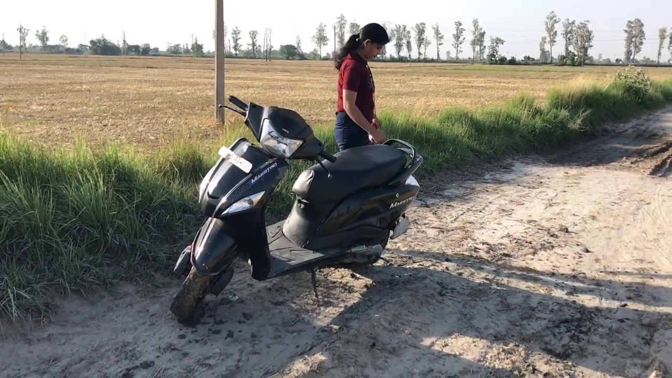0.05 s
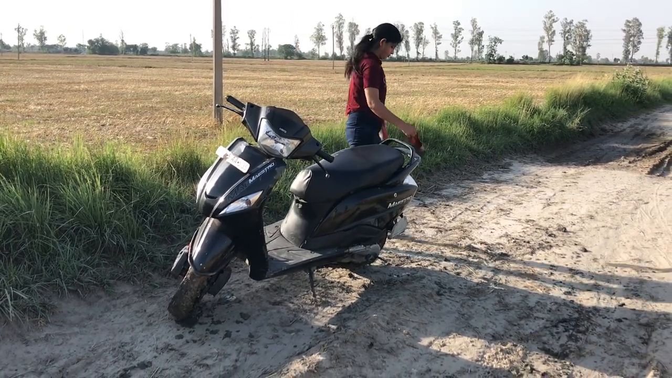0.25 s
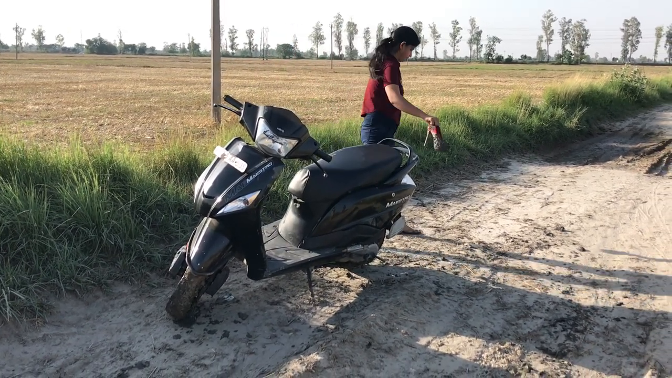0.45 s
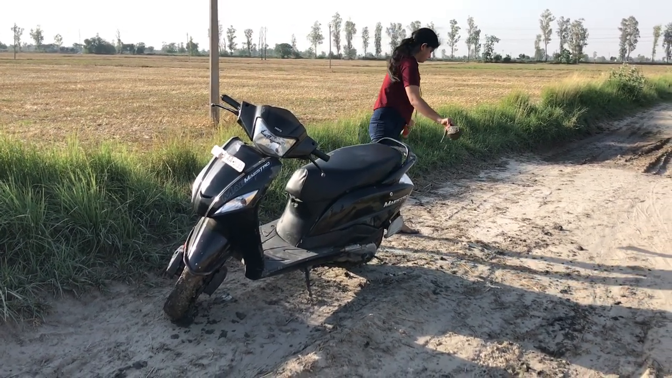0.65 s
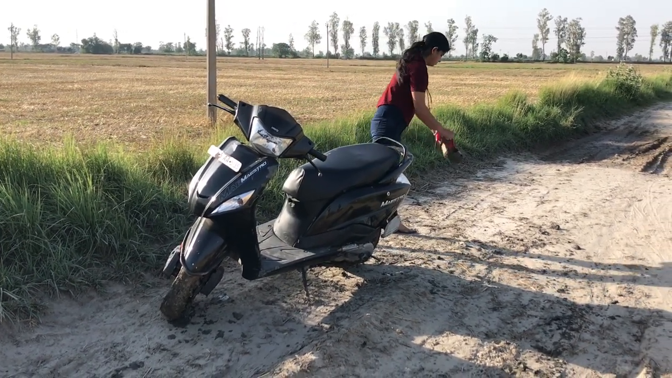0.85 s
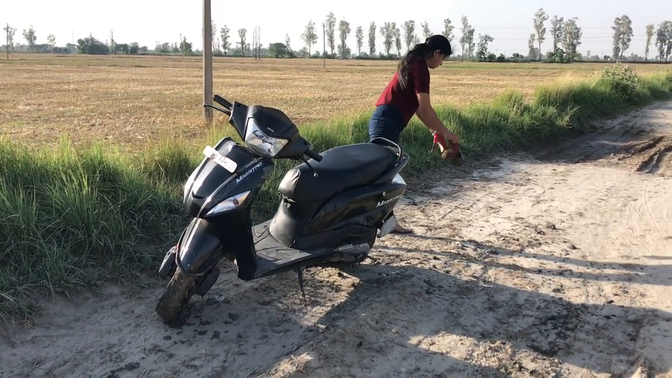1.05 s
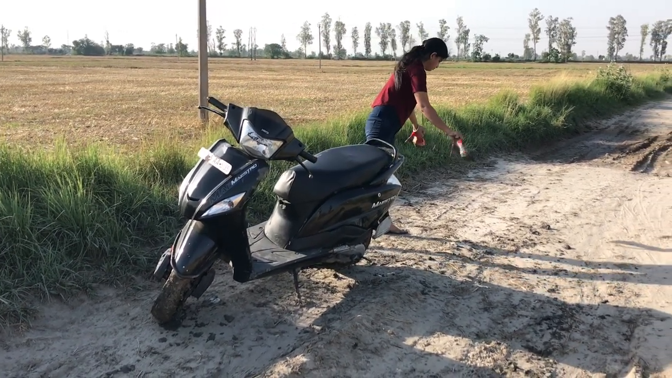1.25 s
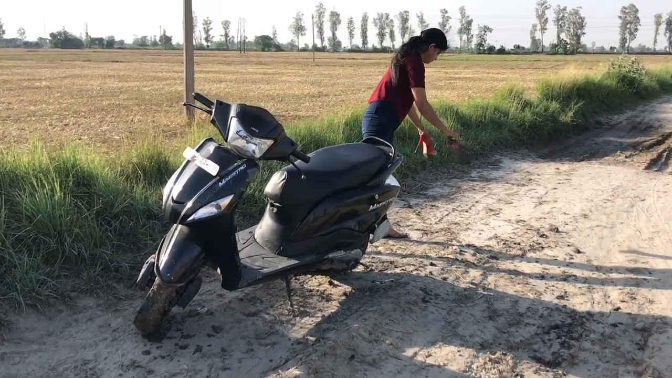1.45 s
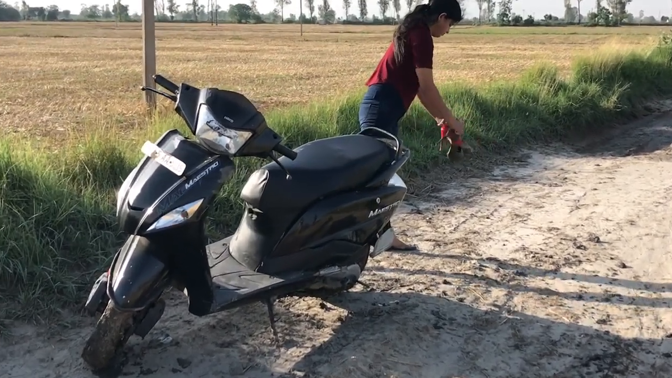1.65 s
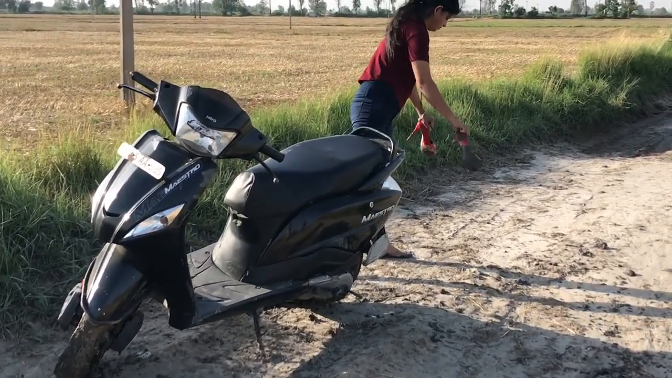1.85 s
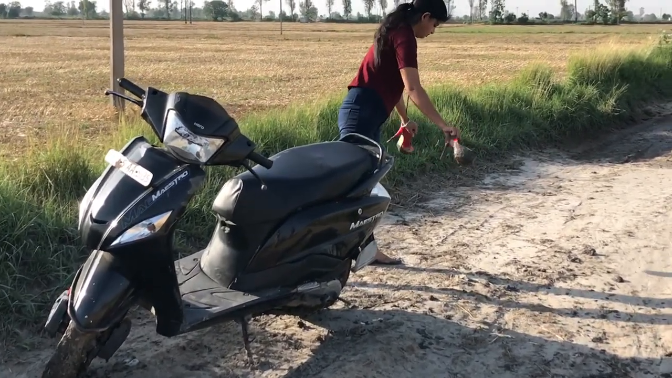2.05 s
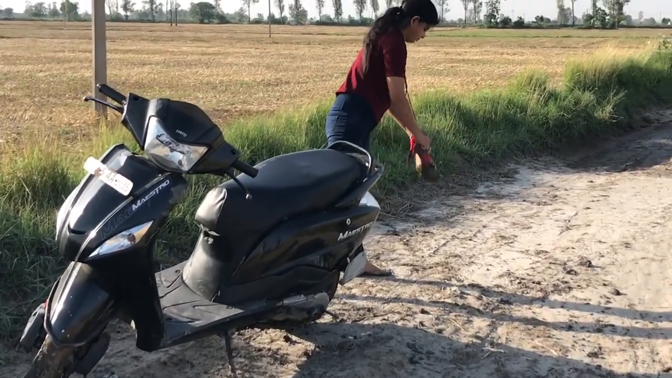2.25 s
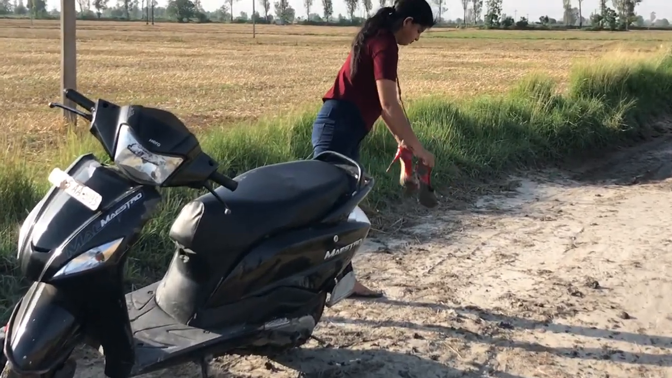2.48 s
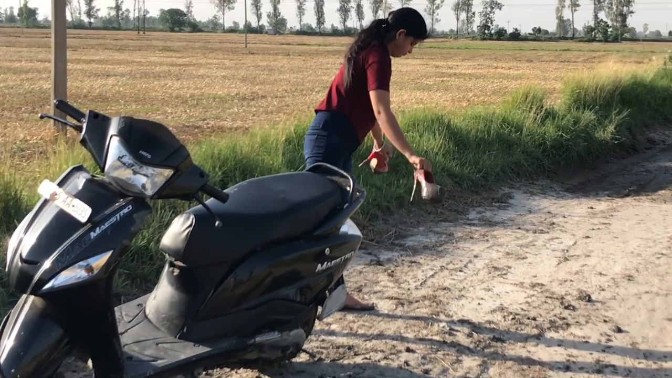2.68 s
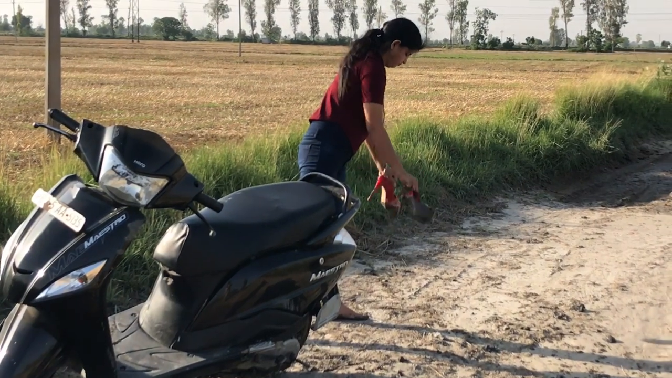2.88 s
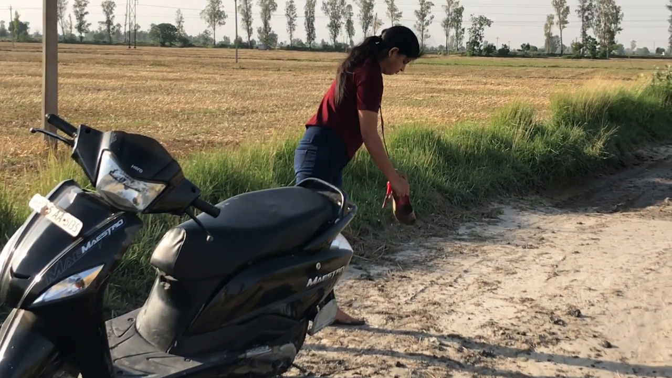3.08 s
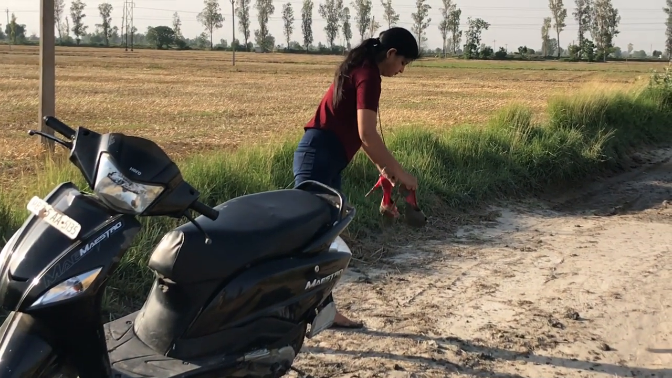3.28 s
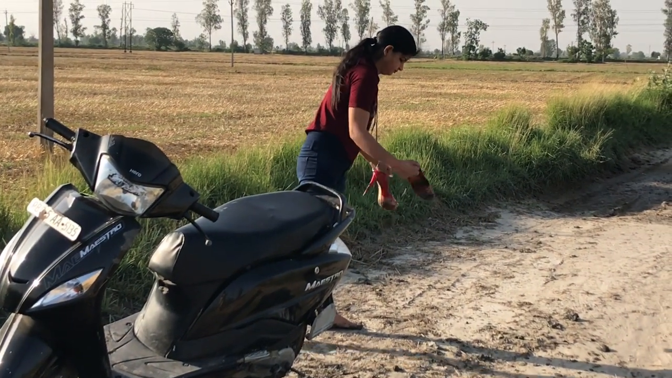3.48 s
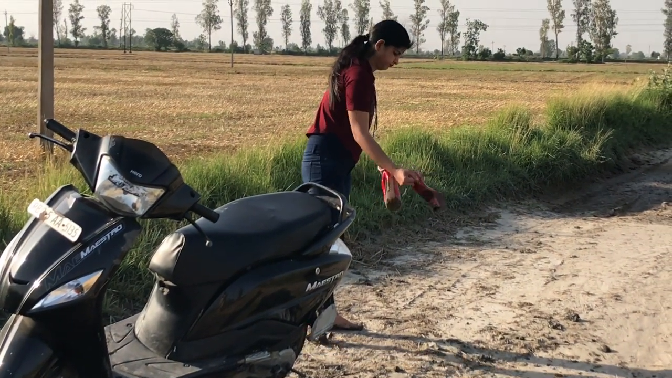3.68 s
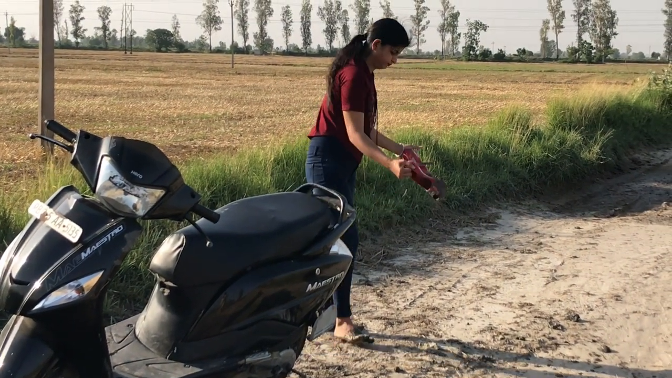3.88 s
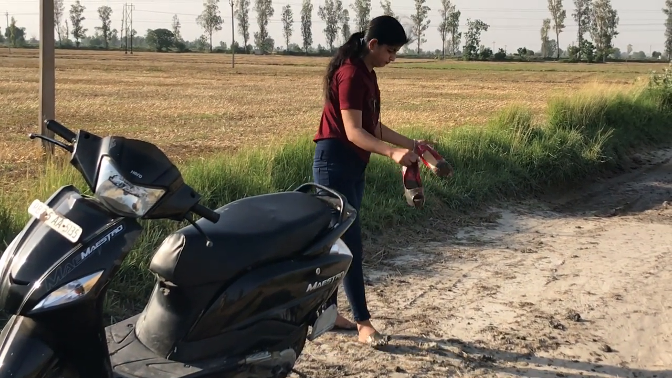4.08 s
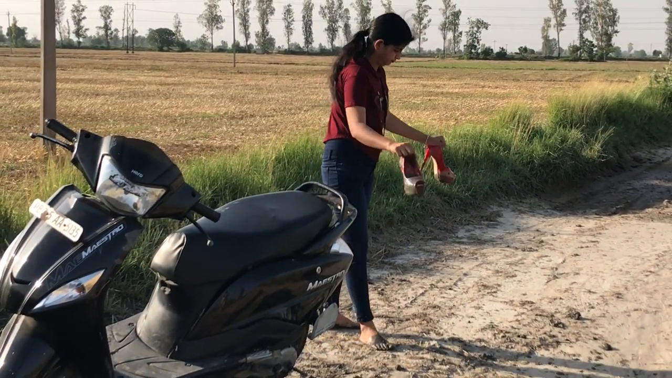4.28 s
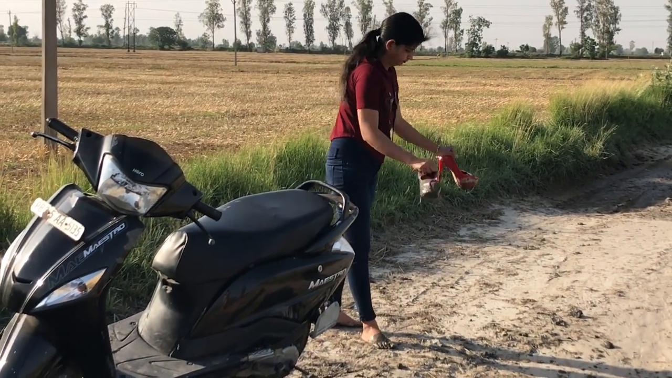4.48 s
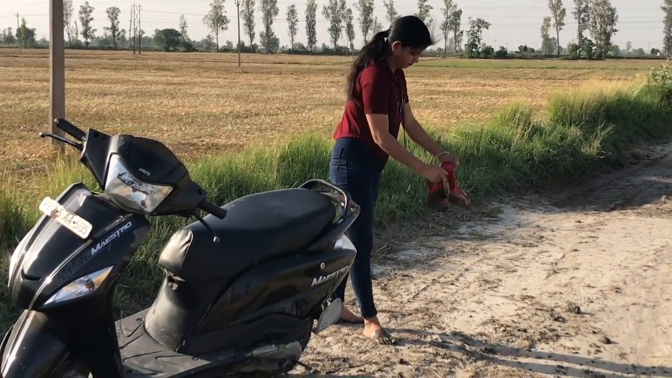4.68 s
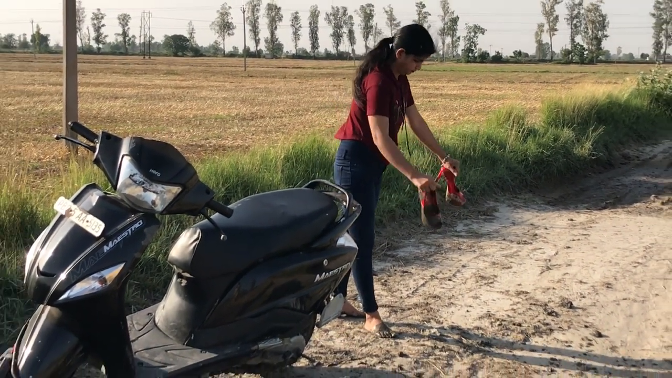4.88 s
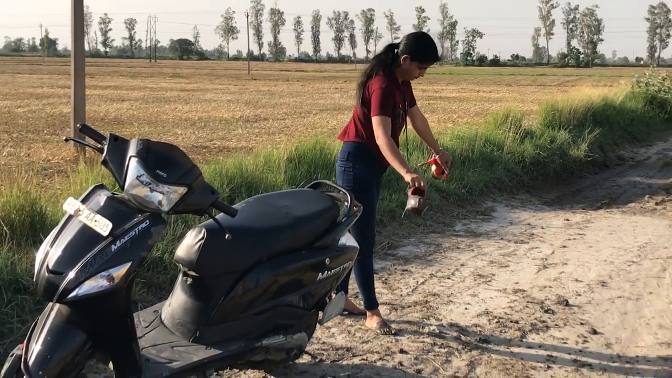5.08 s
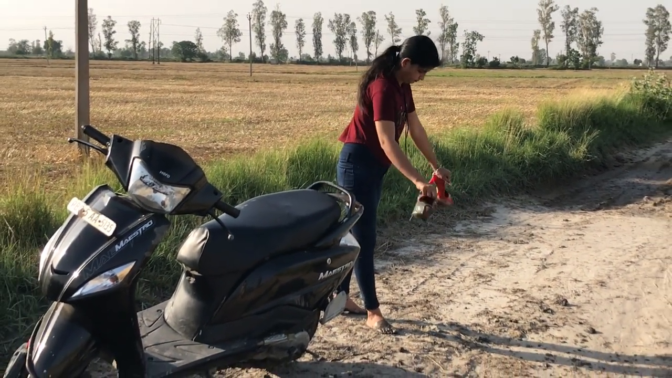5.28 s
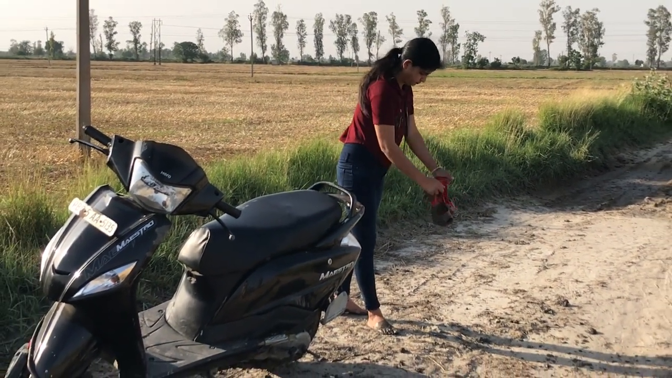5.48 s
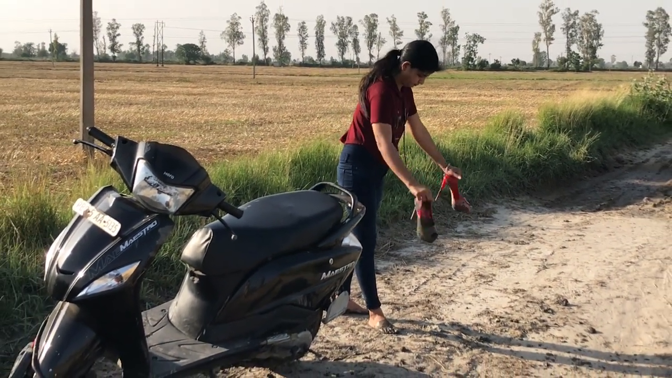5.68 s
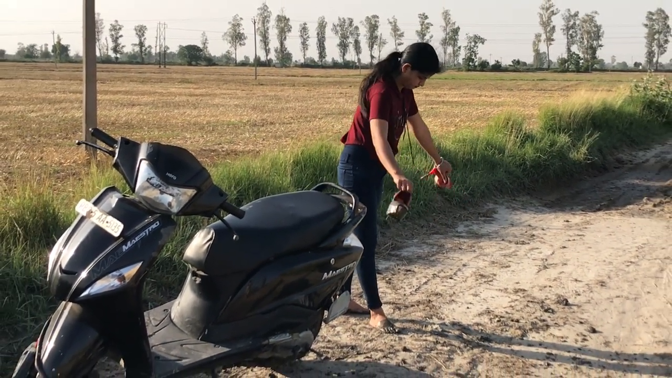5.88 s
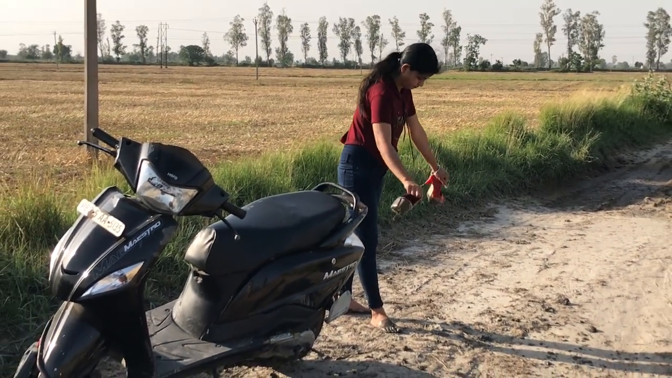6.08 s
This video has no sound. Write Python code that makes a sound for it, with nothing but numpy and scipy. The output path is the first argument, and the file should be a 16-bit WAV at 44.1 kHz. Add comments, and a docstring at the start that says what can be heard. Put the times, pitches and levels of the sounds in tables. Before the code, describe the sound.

Wind rumbles and bumps on the microphone, then two muddy sandals are clapped together six times outdoors, mud crumbs pattering into grass, insects trilling faintly.

```python
"""Wind is heard first, rumbling and bumping on the microphone, with insects trilling high and thin in the verge.
Then two muddy sandals are clapped sole to sole six times on a dirt track between fields.
Each knock sums damped modes (a hollow pop, a thud, a clack) and noise bursts (a slap, a dry crack).
After most knocks the soles rebound; crumbs of mud, short bursts of coloured noise, patter into the grass.
Wind is filtered noise with low damped buffets; insects are falling whistles and narrow noise bands."""
import sys
import numpy as np
from scipy import signal
from scipy.fft import rfft, irfft
from scipy.io import wavfile

SR = 44100
rng = np.random.default_rng(int(sys.argv[2]) if len(sys.argv) > 2 else 0)


def wrap_up_sound(samples):
    """Save the sound to the file named by the first command line argument, as 16-bit audio."""
    columns = np.atleast_2d(samples).T
    # keep every value between -1 and 1, then stretch to whole-number steps
    tamed = np.clip(columns, -1, 1)
    steps = np.round(tamed * 32767).astype(np.int16)
    wavfile.write(sys.argv[1], SR, steps)


N = 270798
TIME = np.arange(N) / SR
AGE = np.arange(SR // 3) / SR   # seconds since the onset of a short sound

# Every spectrum below gives only a shape; its noise is scaled to rms 1 before a level is applied.
# Low rumble of wind on the microphone. Each row: frequency in Hz, level in dB per Hz.
RUMBLE_SPECTRUM = [(20, -21), (32, -9), (48, 1), (65, 3.5), (85, -6), (105, 1.5), (130, -7), (160, -4.5),
                   (215, -9), (270, -15.5), (400, -25)]
# Far rustle of the open fields. Each row: frequency in Hz, level in dB per Hz.
RUSTLE_SPECTRUM = [(200, 7), (400, -3.5), (620, 4), (800, -0.5), (1050, 3.5), (1400, -1.5), (2000, -9),
                   (3000, -24), (5000, -31)]
# Course of that rustle. Each row: time in seconds, level in dB before RUSTLE_GAIN_DB.
RUSTLE_LEVEL = [(0.0, -51.5), (1.2, -50), (1.42, -51), (2.46, -49), (2.74, -49.5), (5.04, -48), (5.61, -51),
                (6.14, -51.5)]
RUMBLE_DB, RUSTLE_GAIN_DB = -37, 1
# Single buffets on the microphone, strong and faint. Each row: start in seconds, level in dB,
# frequency in Hz, cycles until it has lost 60 dB.
BUFFETS = [(0.049, -7.5, 84.6, 2.8), (0.082, -16, 186, 6), (0.127, -15.5, 59.5, 5.5),
           (0.323, -11.5, 86, 5.2), (0.428, -4, 112, 2.2), (0.632, -14.5, 68, 5.1), (0.892, -2, 199, 9.3),
           (0.912, -9.5, 67, 7.2), (0.996, -10, 61, 5.5), (1.168, -22, 213, 6.7), (1.458, -7, 125, 2.4),
           (1.555, -11.5, 69.6, 3.9), (3.828, -9, 171, 2.7), (4.228, -12.5, 86, 4.3)]
# Turbulent air in a buffet. Each row: frequency in Hz, level in dB per Hz.
PUFF_SPECTRUM = [(120, 18), (250, 0), (380, -19), (600, -11), (900, -22)]
# faint buffets scattered through the opening gust
FLUTTER_DB, FLUTTER_HZ, FLUTTER_CYCLES, FLUTTER_UNTIL_S = -20, 131, 7.2, 0.99

# Far trills, each a smooth swell. Each row: start in seconds, end in seconds, level in dB, pitch in Hz.
FAR_TRILLS = [(-.5, 1.0, -67, 8270), (1.5, 2, -64, 8360), (2.15, 3, -69.5, 8470), (2.6, 4.05, -62.5, 8270),
              (4.5, 6.1, -63, 8380)]
# Smear around that pitch. Each row: offset in Hz, level in dB per Hz.
CHORUS_SPECTRUM = [(20, 5), (150, 12), (350, -20), (900, -20), (1500, -35)]
# Near trills. Each row: start in seconds, end in seconds, level in dB, top of each chirp in Hz
# once warm, fall of the chirp in Hz.
NEAR_TRILLS = [(-1.1, 0.205, -57, 8400, 930), (.1, .93, -61, 8560, 800), (1.2, 1.9, -61, 8200, 750),
               (2.85, 3.98, -57.5, 8370, 1100), (5.15, 6.2, -56, 8430, 1150)]
CHIRPS_PER_S = 53.7
# a trill starts soft and flat, then warms up with this time constant; it stops at once
WARM_UP_S, COLD_DB, COLD_FLAT_HZ, TRILL_STOP_S = 0.2, -15, 700, 0.025

# Fine crumbs. Each row: frequency in Hz, level in dB per Hz.
CRUMB_SPECTRUM = [(1500, -11), (3500, -24), (6000, -5), (8600, -4), (10300, -4.5), (12200, 4.5), (14500, 0),
                  (16000, -4)]
# Duller clods. Each row: frequency in Hz, level in dB per Hz.
CLOD_SPECTRUM = [(500, -27), (1200, 13), (2500, 2), (4500, 2), (7000, -30), (12000, -30)]
# Larger lumps landing in the grass. Each row: start in seconds, level in dB, t60 in seconds,
# level in dB of the clod relative to the grit.
LUMPS = [(1.226, -43, 0.0099, 8.5), (1.307, -33, 0.021, -5), (1.673, -36, .018, -7), (3.089, -35, .04, -6),
         (3.1123, -33, 0.031, -14), (3.271, -42.5, .12, -7.5), (3.659, -46.5, 0.021, 11.5),
         (3.734, -37.5, .03, -9), (4.12, -30.5, 0.017, -14), (4.702, -34, .04, -6),
         (4.8175, -33, 0.038, -1.5), (4.87, -45.5, 0.37, -25), (5.6165, -40, .04, -25)]
# every blow flings a spray of grit, then a thinning patter of crumbs
SPRAY_AFTER_S, SPRAY_T60_S, SPRAY_CLOD_DB = 0.042, 0.043, -8.5
PATTER_AFTER_S, PATTER_LASTS_S, PATTER_FADE_DB_PER_S = 0.05, 0.24, 25
PATTER_DB, PATTER_FOLLOWS_BLOW = -52, 0.94   # for a pop of 0 dB; dB per dB of pop
CRUMB_T60_S, CRUMB_CLOD_DB, CRUMB_SPREAD_DB = 0.039, -11, 4
STRAY_DB, STRAY_T60_S = -48, 0.018   # odd crumbs that drop in between

# Blows of sole on sole. Each row: start in seconds, pop in dB, pitch of the trapped air in Hz, thud in dB,
# clack in dB, clack pitch in Hz, slap in dB, centre of the slap in Hz, delay of the rebound in seconds,
# loss of the rebound in dB (62 leaves practically none), flung grit in dB.
KNOCKS = [(0.9298, -0.5, 853, -20.5, 0.5, 1143, -16.5, 3020, .022, 17.5, -30.5),
          (1.6088, -2, 1005, -16, -8, 1783, -12, 3400, 0.017, 62, -30),
          (2.3135, 3, 990, -15.5, -18, 1520, -15, 2540, .018, 16, -28),
          (3.0398, 4, 922, -10.5, -30, 1190, -19.5, 3640, .017, 22, -36),
          (4.654, 5.5, 838, -11, -9, 1514, -6.5, 2210, .017, 18, -38),
          (5.48, 7.5, 858, -9, -2.5, 1347, -10.5, 2260, 0.023, 42, -31)]
# Air pocket between the soles. Each row: multiple of its pitch, level in dB relative to the pop, t60 in seconds.
POP_MODES = [(.7, -8, 0.026), (1, 6.5, 0.015), (1.17, -46, 0.007)]
# The whole sandal flexing. Each row: frequency in Hz, level in dB relative to the thud, t60 in seconds.
THUD_MODES = [(171.6, -1.5, 0.045), (387, 5.5, 0.026), (497, -12, 0.045), (566, -0.5, 0.028)]
# Edge of the sole. Each row: multiple of the clack pitch, level in dB relative to the clack, t60 in seconds.
CLACK_MODES = [(1.001, 3.5, 0.019), (1.14, -7.5, 0.021)]
# The broad slap of the tread. Each row: multiple of its centre, level in dB per Hz.
SLAP_SPECTRUM = [(.25, -33), (.5, 3.5), (.75, -2), (1, -5), (1.25, -5.5), (1.6, -14), (2.999, -23)]
# The breaking crust of mud. Each row: frequency in Hz, level in dB per Hz.
CRACK_SPECTRUM = [(1500, -72), (3500, 7.5), (5000, -2.5), (7000, -1), (8600, 2.5), (10300, -4), (12300, 4),
                  (14500, -1.5), (16000, -15)]
CRACK_DB, CRACK_FOLLOWS_SLAP = -12.5, 0.44   # relative to a blend of pop and slap; share of the slap in it
# a rebound lands on the edges: clack and slap suffer only this share of its loss
REBOUND_CLACK_SHARE, REBOUND_SLAP_SHARE = 0.74, 0.47
REBOUND_CRACK_SHARE = 0.95   # the crust is already broken, so the crack suffers nearly all of it
# The sandals brush as they part. Each row: start in seconds, pop in dB, clack in dB.
BRUSHES = [(0.9774, -21.5, -24.5), (3.1228, -19.5, -37.5), (5.5295, -28, -37), (5.56, -27, -27)]
BRUSH_POP_HZ, BRUSH_CLACK_HZ, BRUSH_SLAP_HZ = 976, 1355, 2380
BRUSH_THUD_DB, BRUSH_SLAP_DB = -37, -4.5   # relative to the pop; to the clack
BRUSH_CRACK_DB = -44

# Near reflections from the track and a parked scooter. Each row: delay in seconds, level in dB.
ECHOES = [(.0021, -22.5), (.0047, -22)]
# Steady microphone hiss. Each row: frequency in Hz, level in dB per Hz.
HISS_SPECTRUM = [(1000, 2), (3000, 4.5), (4300, 1.5), (5500, 0), (7000, 0.5), (9200, 2.5), (10300, -4.5),
                 (11300, 2), (12300, 7.5), (13400, -0.5), (14400, 6.5), (16000, -5)]
HISS_DB, CUTOFF_HZ = -56, 16000


def from_db(db):
    """A level in decibels is the logarithm of an amplitude ratio; return that ratio."""
    return 10 ** (np.asarray(db) / 20)


def dying(t60):
    """Exponential decay: a freely damped amplitude loses 60 dB in t60 seconds."""
    return np.exp(-np.log(1000) * AGE / max(t60, 1e-3))


def coloured(x, spectrum):
    """Linear filtering: weight each frequency by a spectrum with sloping skirts, then scale to rms 1."""
    hz, db = np.transpose(spectrum)
    f = np.maximum(np.fft.rfftfreq(len(x), 1 / SR), 1)
    skirts = np.minimum(f / hz[0], 1) ** 2 * np.minimum(hz[-1] / f, 1) ** 2
    gain = from_db(np.interp(np.log(f), np.log(hz), db))
    y = irfft(rfft(x) * skirts * gain, len(x))
    return y / np.std(y)


def noise(spectrum, size):
    """Gaussian noise: many independent disturbances sum to a random signal of a given colour."""
    return coloured(rng.standard_normal(size), spectrum)


def flicker(per_s, depth_db, size):
    """Random modulation: a gain of rms 1 heads for a new random value per_s times a second."""
    knots = rng.standard_normal(size // 8)
    position = np.arange(size) * per_s / SR
    gain = from_db(depth_db * np.interp(position, np.arange(len(knots)), knots))
    return gain / np.sqrt(np.mean(gain ** 2))


def ring(hz, t60, swell):
    """Damped vibration: a mode builds up while the contact lasts, then decays freely."""
    return np.sin(2 * np.pi * hz * AGE) * dying(t60) * (1 - np.exp(-(AGE / swell) ** 2))


def ring_modes(modes, base_hz, swell):
    """Modal superposition: a struck body sounds the sum of its damped modes."""
    return sum(from_db(db) * ring(base_hz * ratio, t60, swell) for ratio, db, t60 in modes)


def add(track, s, sound):
    """Superposition: pressures add, so a sound is summed into the track from time s."""
    start = max(int(s * SR), 0)
    track[start:start + len(sound)] += sound[:N - start]


def scattered(start, end, count):
    """Stratified chance: random moments cover a span, one in each equal part of it."""
    return start + (end - start) * (np.arange(count) + rng.random(count)) / count


def buffet(db, hz, cycles):
    """Impulsive excitation: a lump of air hits the microphone as a few low cycles and a turbulent puff."""
    puff_shape = np.exp(-((AGE - 0.006) / 0.0059) ** 2) * (1 - np.exp(-AGE / 0.0011))
    puff = noise(PUFF_SPECTRUM, len(AGE)) * puff_shape
    return from_db(db) * (ring(hz, cycles / hz, swell=0.35 / hz) + from_db(-21.5) * puff)


def wind():
    """Aerodynamic noise: turbulence gives a low rumble, a far rustle of fields and single buffets."""
    out = from_db(RUMBLE_DB) * noise(RUMBLE_SPECTRUM, N) * flicker(13, 1.1, N)
    rustle_db = np.interp(TIME, *np.transpose(RUSTLE_LEVEL))
    out += from_db(rustle_db + RUSTLE_GAIN_DB) * noise(RUSTLE_SPECTRUM, N) * flicker(7.3, 0.82, N)
    for s, db, hz, cycles in BUFFETS:
        add(out, s, buffet(db, hz, cycles))
    for s in scattered(0, FLUTTER_UNTIL_S, count=7):
        hz = FLUTTER_HZ * 2 ** rng.uniform(-0.95, 1)
        add(out, s, buffet(FLUTTER_DB, hz, FLUTTER_CYCLES))
    return out


def far_insects():
    """Amplitude modulation: low noise on a sine carrier makes a thin band, as far singers blur together."""
    out = np.zeros(N)
    for start, end, db, hz in FAR_TRILLS:
        progress = np.clip((TIME - start) / (end - start), 0, 1)
        swell = np.sqrt(np.abs(np.sin(np.pi * progress)))
        carrier = np.sqrt(2) * np.sin(2 * np.pi * hz * TIME)
        out += from_db(db) * swell * noise(CHORUS_SPECTRUM, N) * carrier
    return out


def near_insects():
    """Frequency sweep: each wing stroke is a falling whistle; a trill grows louder and higher as it warms up."""
    out = np.zeros(N)
    for start, end, db, top_hz, fall_hz in NEAR_TRILLS:
        age = np.arange(int((end - start) * SR)) / SR
        cold = np.exp(-age / WARM_UP_S)
        sweep = np.minimum((age * CHIRPS_PER_S) % 1 / 0.68, 1)   # the wings rest for the end of each cycle
        hz = top_hz - COLD_FLAT_HZ * cold - fall_hz * sweep ** 1.7
        hz *= flicker(1600, 0.054, N)[:len(age)]
        stroke = np.sqrt(np.abs(np.sin(np.pi * sweep ** 1.1))) * (1 - 0.5 * sweep)
        chirps = np.sin(2 * np.pi * np.cumsum(hz) / SR) * stroke
        stop = np.minimum((age[-1] - age) / TRILL_STOP_S, 1)
        level = from_db(db + COLD_DB * cold) * stop * flicker(48.3, 0.75, N)[:len(age)]
        trill = level * chirps / np.std(chirps)
        add(out, start, trill[start + age >= 0])   # a trill may already be under way at time 0
    return out


def spatter(db, t60, clod_db):
    """Fragmentation noise: a piece of mud bursts into flickering grit, with a duller clod in it."""
    size = len(AGE)
    grit = noise(CRUMB_SPECTRUM, size) + from_db(clod_db) * noise(CLOD_SPECTRUM, size)
    landing = dying(t60) * (1 - np.exp(-AGE / (0.0083 * abs(t60))))   # a long spatter also starts more gradually
    return from_db(db) * grit * flicker(740, 2.3, size) * landing


def grains(per_s, size):
    """Random impulses: single specks of uneven size strike over a bed of finer dust."""
    specks = (rng.random(size) < per_s / SR) * rng.standard_normal(size)
    return specks + from_db(-24) * rng.standard_normal(size)


def crumbs():
    """Granular impact: blows shed a spray, a patter and sifting dust; lumps and stray crumbs drop too."""
    out = np.zeros(N)
    sifting = np.sin(np.pi * np.sqrt(AGE / AGE[-1])) ** 2
    for s, pop_db, *_, spray_db in KNOCKS:
        add(out, s + SPRAY_AFTER_S, spatter(spray_db, SPRAY_T60_S, SPRAY_CLOD_DB))
        for age in PATTER_LASTS_S * scattered(0, 0.98, count=12) ** 2:   # squared: dense first, then thinning
            db = PATTER_DB + PATTER_FOLLOWS_BLOW * pop_db - PATTER_FADE_DB_PER_S * age
            db += CRUMB_SPREAD_DB * rng.standard_normal()
            add(out, s + PATTER_AFTER_S + age, spatter(db, CRUMB_T60_S, CRUMB_CLOD_DB))
        dust = coloured(grains(420, len(AGE)), CRUMB_SPECTRUM) * sifting
        add(out, s, from_db(pop_db - 64) * dust)
    for s, db, t60, clod_db in LUMPS:
        add(out, s, spatter(db, t60, clod_db))
    for s in scattered(KNOCKS[0][0], TIME[-1], count=12):
        db = STRAY_DB + CRUMB_SPREAD_DB * rng.standard_normal()
        add(out, s, spatter(db, STRAY_T60_S, CRUMB_CLOD_DB))
    return out


def contact(pop_db, pocket_hz, thud_db, clack_db, clack_hz, slap_db, slap_hz, crack_db):
    """Impact: squeezed air pops, the rubber thuds and slaps, an edge clacks, the mud crust cracks."""
    size = len(AGE)
    # the soles close over a few ms, so the low sounds swell after the first crack
    pop = from_db(pop_db) * ring_modes(POP_MODES, pocket_hz, swell=0.0015)
    thud = from_db(thud_db) * ring_modes(THUD_MODES, 1, swell=0.0012)
    clack = from_db(clack_db) * ring_modes(CLACK_MODES, clack_hz, swell=0.0012)
    pressure = np.exp(-(AGE / 0.0043) ** 2) * (1 - np.exp(-AGE / 0.00015))
    pressure += from_db(-18.5) * dying(0.079)
    slap = from_db(slap_db) * noise(np.array(SLAP_SPECTRUM) * [slap_hz, 1], size) * pressure
    breaking = dying(0.015) + from_db(-25) * dying(0.17)
    crack = from_db(crack_db) * noise(CRACK_SPECTRUM, size) * flicker(2420, 1.1, size) * breaking
    return pop + thud + clack + slap + crack


def knocks():
    """Rebound: a weaker contact follows most blows, the second has practically none; some partings brush."""
    out = np.zeros(N)
    for (s, pop_db, pocket_hz, thud_db, clack_db, clack_hz,
         slap_db, slap_hz, rebound_s, loss_db, _) in KNOCKS:
        crack_db = CRACK_DB + pop_db + CRACK_FOLLOWS_SLAP * (slap_db - pop_db)
        add(out, s, contact(pop_db, pocket_hz, thud_db, clack_db, clack_hz, slap_db, slap_hz, crack_db))
        rebound = contact(pop_db - loss_db, pocket_hz, thud_db - loss_db,
                          clack_db - REBOUND_CLACK_SHARE * loss_db, clack_hz,
                          slap_db - REBOUND_SLAP_SHARE * loss_db, slap_hz,
                          crack_db - REBOUND_CRACK_SHARE * loss_db)
        add(out, s + rebound_s, rebound)
    for s, pop_db, clack_db in BRUSHES:
        brush = contact(pop_db, BRUSH_POP_HZ, pop_db + BRUSH_THUD_DB, clack_db, BRUSH_CLACK_HZ,
                        clack_db + BRUSH_SLAP_DB, BRUSH_SLAP_HZ, BRUSH_CRACK_DB)
        add(out, s, brush)
    return out


def outdoors(x):
    """Reflection and scattering: two near echoes, then a faint scatter from rough ground and grass."""
    echoes = sum(from_db(db) * np.interp(TIME - delay, TIME, x) for delay, db in ECHOES)
    decay = dying(0.027) + from_db(-30) * dying(0.48)
    scatter = rng.standard_normal(len(AGE)) * decay * (1 - np.exp(-(AGE / 0.0077) ** 2))
    scatter /= np.linalg.norm(scatter)
    return x + echoes + from_db(-22.5) * signal.fftconvolve(x, scatter)[:N]


def scene():
    """Superposition of wind, insects, falling mud and the clapped sandals."""
    return (wind() + far_insects() + near_insects() + crumbs() + outdoors(knocks()))[None]


def record(dry):
    """Transduction: the microphone hisses, the hardest knocks overload it, the top is cut."""
    x = dry + from_db(HISS_DB) * noise(HISS_SPECTRUM, N)
    x = x / (1 + x ** 8) ** (1 / 8)   # smooth saturation towards full scale
    low_pass = signal.ellip(10, 0.1, 70, CUTOFF_HZ, fs=SR, output="sos")
    return signal.sosfilt(low_pass, x)


dry = scene()
out = record(dry)
wrap_up_sound(out)
```